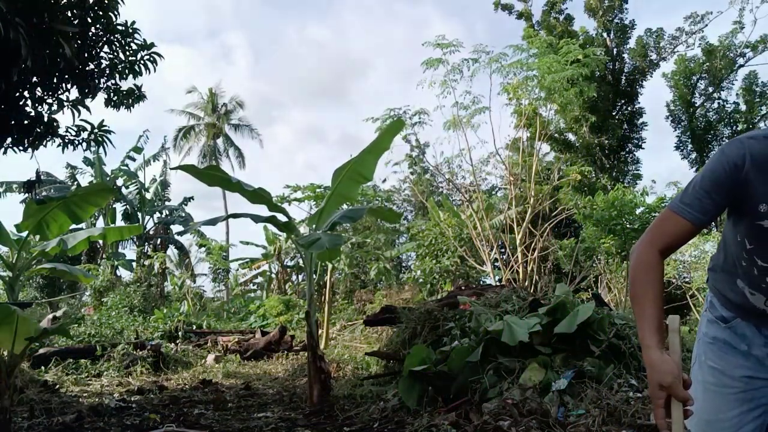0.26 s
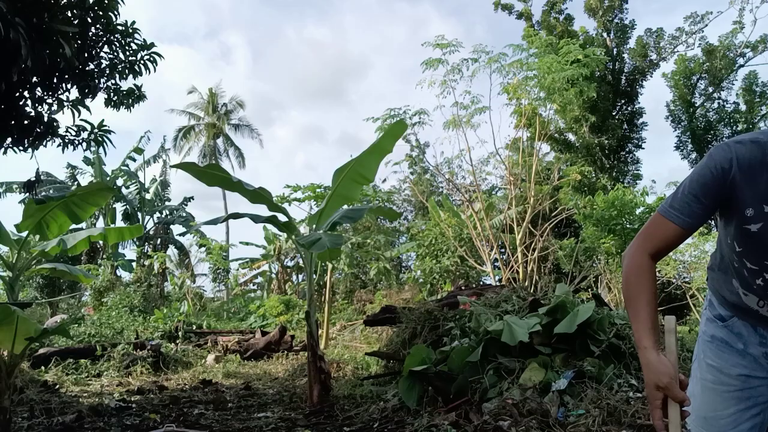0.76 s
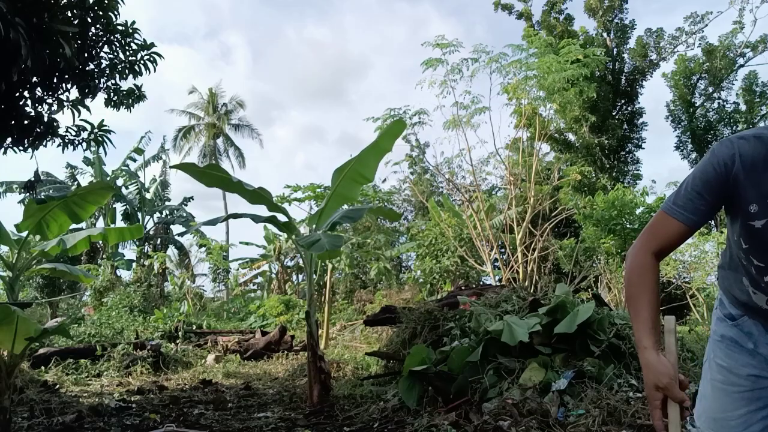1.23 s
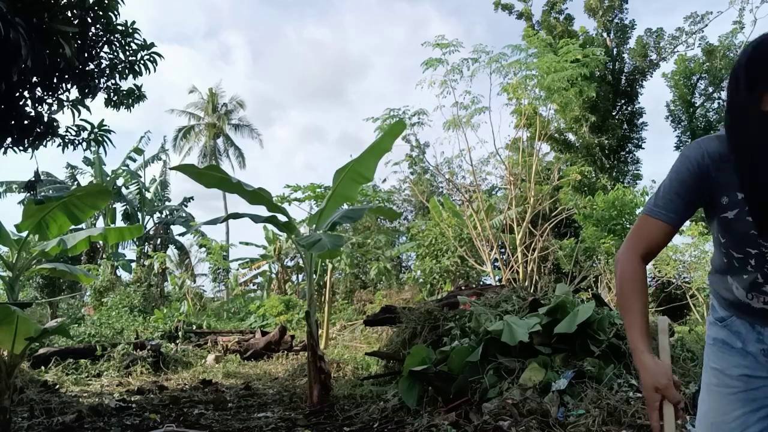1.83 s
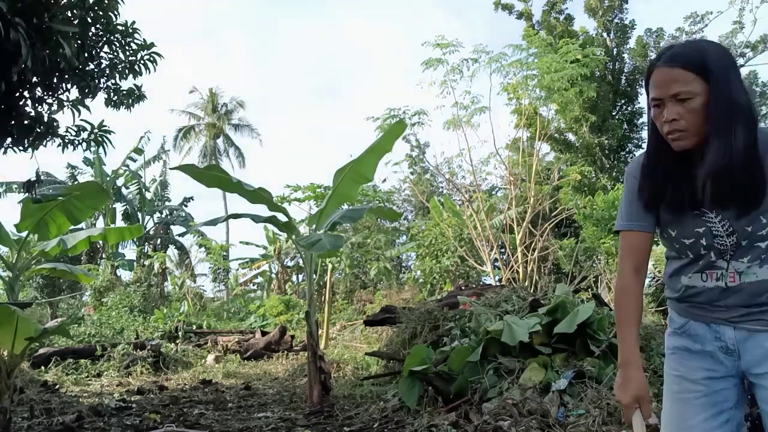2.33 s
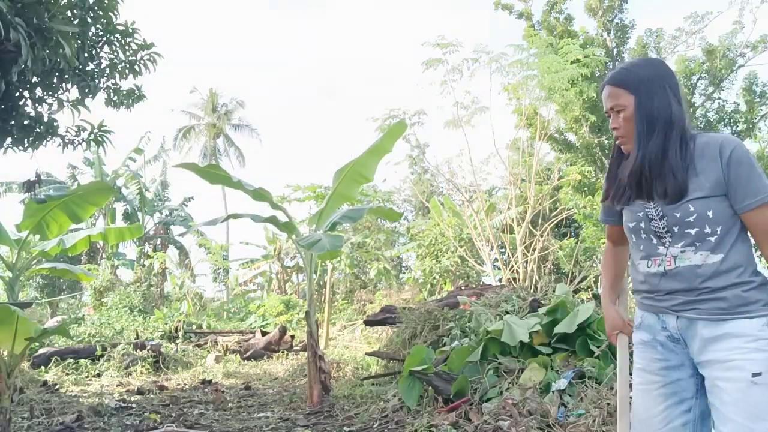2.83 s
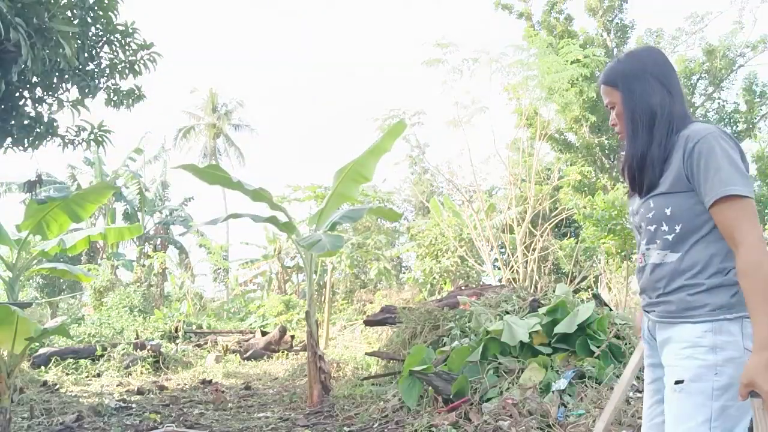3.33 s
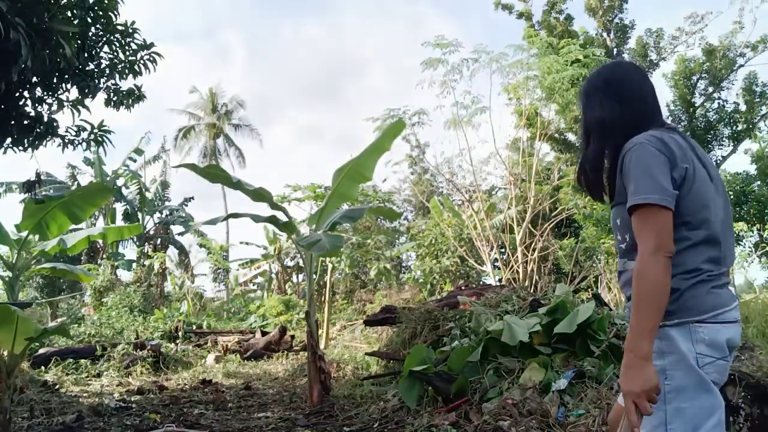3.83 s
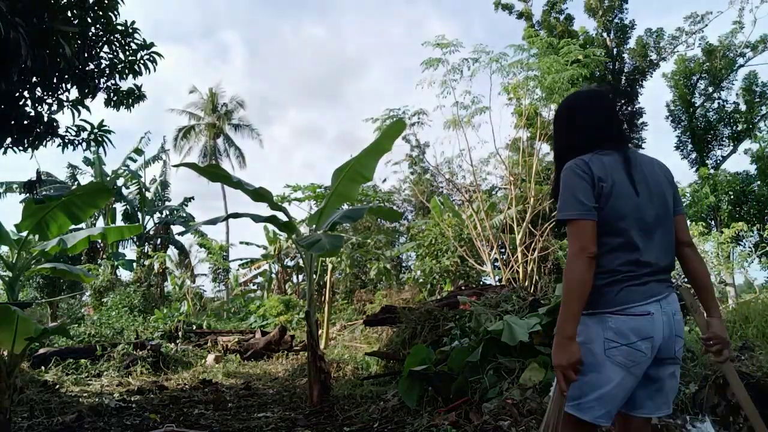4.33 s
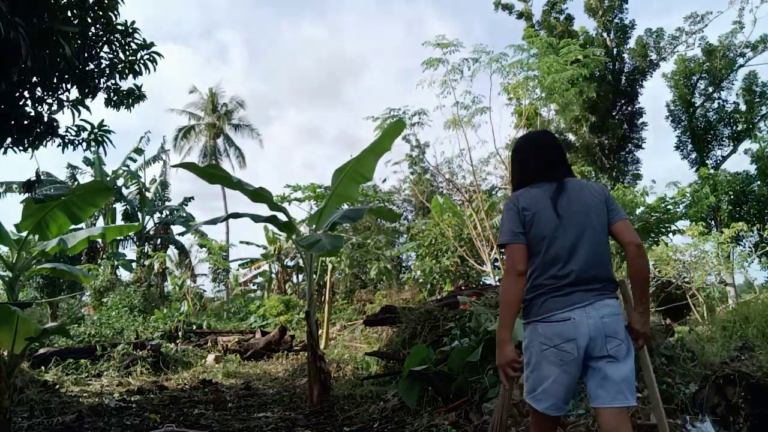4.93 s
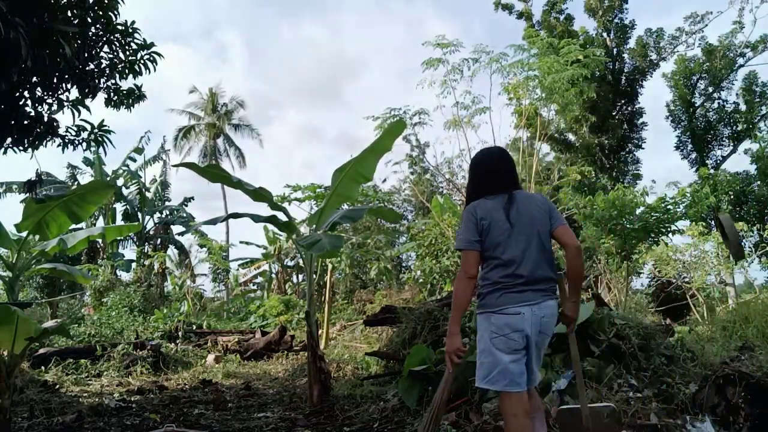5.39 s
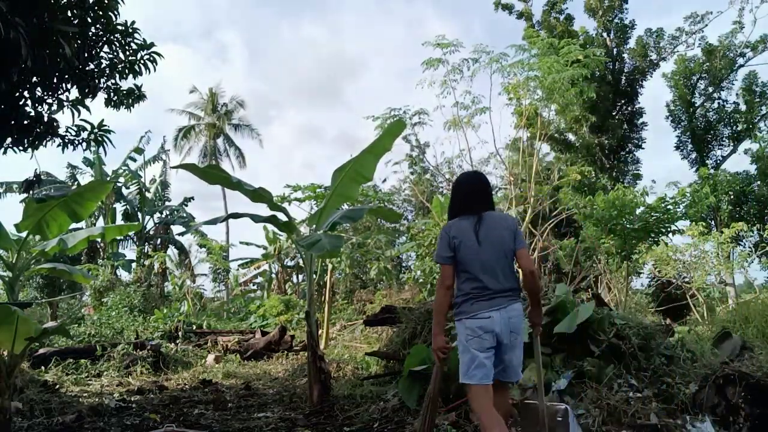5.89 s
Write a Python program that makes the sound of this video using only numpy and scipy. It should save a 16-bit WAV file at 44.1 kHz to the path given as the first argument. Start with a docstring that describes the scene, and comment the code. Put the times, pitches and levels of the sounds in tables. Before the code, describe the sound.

Near stereo microphones outdoors catch irregular twig-broom sweeps over bare soil, leaves crunching and stems snapping. The sweeping gives way to small pan ticks, then one hard, short clank with a thud. Quieter footsteps rustle through leaf litter, with isolated snaps and dull ground thuds. A distant rooster crows weakly between a few late pan knocks, over soft air in the trees and low rumble.

```python
"""Sweeping dry leaves

A stiff twig broom sweeps dry leaves over bare soil into a dustpan, close by in a garden.
Broom and litter are patchy grained noise plus damped tones; the knocked pan is a bank of modes.
Twig snaps and thuds are resonant noise bursts; steps stir the litter. A far rooster is a hoarse
gliding tone, the garden air a swaying noise. Two microphones differ in colour and place."""
import sys
import numpy as np
from scipy import signal
from scipy.fft import rfft, irfft, next_fast_len
from scipy.io import wavfile
from scipy.ndimage import uniform_filter1d, map_coordinates

SR = 44100
rng = np.random.default_rng(int(sys.argv[2]) if len(sys.argv) > 2 else 0)


def to_wav(sig):
    """Store sig (one row per channel, or 1-D mono) as 16-bit WAV at the path in sys.argv[1].

    Samples outside -1..1 are clipped; the rate is SR.
    """
    pcm = np.clip(np.atleast_2d(sig), -1, 1) * 32767
    pcm = np.round(pcm).astype(np.int16)
    wavfile.write(sys.argv[1], SR, pcm.T)  # frames by channels


N = 271215


def amp(db):
    """Gain of a level in dB."""
    return 10 ** (np.asarray(db) / 20)


def unit(x):
    """x at rms 1."""
    return x / np.sqrt(np.mean(x ** 2) + 1e-20)


def along(points, hz):
    """Value at hz from (f/Hz, value) points, linear on a log frequency axis."""
    f, v = np.transpose(points)
    return np.interp(np.log(hz + 1), np.log(f + 1), v)


def curves(rows):
    """One value per sample for each column after the time."""
    s, *cols = np.transpose(rows)
    return [np.interp(np.arange(N) / SR, s, c) for c in cols]


def wobble(knots_per_s):
    """Smooth random curve through normal knots."""
    knots = rng.standard_normal(int(N * knots_per_s / SR) + 4)
    return map_coordinates(knots, [np.arange(N) * knots_per_s / SR])


def filtered(x, response):
    """x times a complex response of frequency."""
    m = next_fast_len(N + SR // 2)
    return irfft(rfft(x, m) * response(np.fft.rfftfreq(m, 1 / SR)), m)[..., :N]


def blend(pair, alike):
    """Two unrelated signals mixed to a left and right of the given likeness."""
    def mix(hz):
        angle = np.arccos(np.clip(along(alike, hz), -1, 1)) / 2
        return np.array([np.cos(angle), np.sin(angle)])
    mid, side = filtered(pair, mix)
    return np.array([mid + side, mid - side])


def arrive(pair, lead_s):
    """Time difference of a source off to the left: the left leads the right by lead_s."""
    return filtered(pair, lambda hz: np.exp(1j * np.pi * hz * lead_s * np.array([[1], [-1]])))


def crackle(per_s, life_s, spread_db, bed):
    """Loudness of many tiny contacts: sudden bursts of uneven size that die fast, over a smooth bed."""
    chance, size = rng.random(N), rng.exponential(size=N)
    starts = (chance < per_s / SR) * amp(spread_db * np.minimum(size, 5)) ** 2
    power = signal.lfilter([1], [1, -np.exp(-1 / (life_s * SR))], starts)
    return np.sqrt(power / power.mean() + bed)


def rush(spectrum, alike, patchy_db, grain=1):
    """Grained stereo noise of rms 1, with random gain in patches of time and frequency."""
    z = signal.stft(grain * rng.standard_normal((2, N)), nperseg=256)[2]
    field = uniform_filter1d(rng.standard_normal(z.shape[1:]), size=2, axis=0)
    field = uniform_filter1d(field, size=10, axis=1)
    pair = signal.istft(z * amp(patchy_db * unit(field)), nperseg=256)[1][:, :N]
    coloured = filtered(pair, lambda hz: amp(along(spectrum, hz)))
    return unit(blend(coloured, alike))


def swells(rows, roundness, lag_s=0, slower=1):
    """Gain per level column: 20 dB up in the rise, 20 dB down in the fall; event powers add.

    roundness is the power of time by which the level leaves its top: 1 a peak, 2 a dome.
    """
    t, power = np.arange(0, N + 32, 32) / SR, 0
    for s, rise_s, fall_s, *level_db in rows:
        u = (t - s - lag_s) / slower
        away = np.where(u < 0, -u / max(rise_s, .002), u / max(fall_s, .002))
        drop_db = np.minimum(20 * away ** roundness, 200)
        power = power + amp(np.array(level_db)[:, None] - drop_db) ** 2
    return np.sqrt([np.interp(np.arange(N) / SR, t, p) for p in power])


# Left-right likeness of near sources: f/Hz, likeness/1
NEAR_ALIKE = [(60, 0.97), (250, 0.95), (1000, 1), (2200, 0.45), (4500, 0.29), (12000, 0.062)]


def cracks(count, centre_hz, cycles):
    """Brittle leaves breaking: short damped tones of scattered pitch and very uneven size, rms 1."""
    when, pitch, size, place = rng.random((count, 4)).T[:, :, None]
    k = np.arange(256)
    hz = centre_hz * 2 ** (2.4 * (pitch - .5))
    decay = np.exp(-np.e * k * hz / SR / cycles)
    tones = amp(-4 * np.log(size + 0.039)) * decay * np.sin(2 * np.pi * hz * k / SR)
    spots = ((when * N).astype(int) + k).ravel()
    pair = []
    for pan_law in (np.cos, np.sin):
        panned = tones * pan_law(2 * np.pi * place)
        pair.append(np.bincount(spots, panned.ravel(), N + 256)[:N])
    return unit(blend(np.array(pair), NEAR_ALIKE))


# Relative spectra of bristle hiss, leaf crackle, scrape, rumble: f/Hz, level/(dB per Hz)
BRISTLES = [(2940, -13), (5000, -2.5), (6960, 5.5), (7550, -2), (8660, 2.5), (9430, 2), (12200, 1),
            (14900, 7), (15500, -38)]
LEAVES = [(710, -54), (1200, -7), (1290, -10), (1510, -9), (2660, -1), (3630, -1.5), (4990, -5.5),
          (6730, -4), (7660, -9.5), (8300, -4.5), (13000, -16)]
SCRAPE = [(240, -38), (400, -14.5), (790, -7), (868, -11.5), (960, -4), (1040, -6.5), (2000, -6.5),
          (2600, -10), (4400, -120)]
RUMBLE = [(35, -41), (60, -19), (263, -0.5), (480, -9), (620, -9), (1060, -120)]
# Long broom strokes: t/s of the top, rise/s, fall/s, hiss/dB, leaf/dB, scrape/dB
STROKES = [(0.014, 0.1, 0.077, -37.5, -43.5, -59), (0.335, 0.12, 0.1, -20, -27, -65),
           (1.005, 0.12, .14, -21.5, -26, -48), (1.162, 0.056, 0.066, -29.5, -36.5, -62),
           (1.575, .14, 0.15, -22.5, -30.5, -70)]
# Gritty scrapes and crunches of leaves and soil, with low rumble: t/s of the top, rise/s, fall/s,
# hiss/dB, leaf/dB, scrape/dB, rumble/dB
CRUNCHES = [(0.062, .02, .04, -60, -60, -48, -63), (0.182, 0.031, .12, -76, -45, -35.5, -36),
            (0.385, 0.043, 0.024, -42.5, -51, -32.5, -53), (0.442, 0.035, 0.054, -19, -19.5, -19, -34),
            (0.468, 0.027, 0.093, -28, -27, -25.5, -41.5), (0.575, 0.03, 0.037, -37.5, -47, -37.5, -53),
            (0.612, 0.038, 0.078, -38, -30, -41.5, -54), (0.7, 0.15, 0.12, -41, -39.5, -45.5, -55),
            (0.764, .015, 0.12, -27, -24.5, -28.5, -35.5), (0.814, 0.062, 0.096, -38, -24, -29, -37.5),
            (0.9, 0.017, 0.15, -53, -31, -37, -49), (1.226, .01, 0.036, -39.5, -48, -49, -73),
            (1.26, 0.044, 0.081, -40, -48, -70, -67), (1.33, 0.02, 0.12, -66, -44, -45, -55),
            (1.418, 0.025, 0.039, -40, -50, -56, -68), (1.608, 0.042, 0.068, -23, -24, -25.5, -53),
            (1.68, 0.1, 0.07, -38, -34.5, -36, -38.5), (1.75, 0.025, 0.049, -38, -36.5, -44, -69),
            (1.8, 0.016, 0.066, -39, -37.5, -55, -73), (1.852, 0.028, .04, -43, -57, -41.5, -55),
            (1.914, 0.067, .11, -49, -24.5, -31, -38), (2.185, 0.03, 0.2, -70, -58, -52, -57),
            (2.297, 0.049, 0.04, -64, -62, -52.5, -49.5), (2.96, 0.05, 0.047, -70, -60, -49, -57),
            (3.014, .006, 0.058, -62, -45, -34.5, -60), (5.696, .008, 0.069, -58, -48, -40.5, -55),
            (5.765, .03, .05, -60, -52, -44, -58)]
# Litter stirred by feet and carried tools: t/s of the top, rise/s, fall/s, hiss/dB, leaf/dB
RUSTLES = [(2.328, 0.012, .1, -58, -48.5), (2.528, 0.031, 0.061, -53.5, -45.5),
           (2.59, 0.04, 0.066, -69, -59.5), (2.972, 0.071, 0.076, -46, -41), (3.012, .02, 0.11, -88, -48),
           (3.14, 0.023, 0.079, -51, -64), (3.192, 0.024, 0.052, -39, -55), (3.232, .03, 0.035, -46.5, -50),
           (3.275, 0.047, 0.14, -60, -53.5), (3.616, 0.0059, 0.076, -54, -51.5),
           (3.714, .015, 0.044, -49.5, -60), (3.815, .01, 0.042, -47.5, -71),
           (3.882, 0.057, 0.047, -42.5, -46.5), (3.97, 0.066, 0.23, -56.5, -52),
           (4.03, 0.047, .04, -51, -51.5), (4.124, 0.11, 0.082, -52.5, -57),
           (4.244, 0.07, 0.048, -45.5, -54.5), (4.43, 0.031, .08, -53.5, -64),
           (4.496, 0.056, 0.049, -47, -51), (4.61, 0.072, 0.021, -52.5, -68), (4.9, 0.14, 0.14, -54, -58.5),
           (4.962, 0.018, 0.038, -51.5, -42.5), (5.025, .005, 0.039, -60, -63),
           (5.694, 0.01, 0.081, -55, -38), (5.73, 0.023, 0.059, -62, -43), (5.762, 0.06, 0.04, -75, -44.5),
           (6.05, 0.049, 0.032, -45, -54), (6.145, 0.036, .04, -55, -60)]
# Litter ticking between events: t/s, leaf level/dB
SETTLING = [(0, -57), (2.1, -66), (2.75, -69.5), (3.4, -64), (4.0, -68.5), (5.0, -62), (5.5, -78.5),
            (5.85, -63), (6.15, -61.5)]
STROKE_ROUND, CRUNCH_ROUND, RUSTLE_ROUND = 2.29, 0.94, 1.01
RUMBLE_LAG_S, RUMBLE_SLOWER = 0.0065, 1.1
SETTLING_HISS_DB = -0.5  # re leaf level


def broom():
    """Bristle tips hiss, leaves crackle in coarser grains, gritty scrapes and rumbles come in lumps."""
    stroke = swells(STROKES, STROKE_ROUND)
    crunch = swells(CRUNCHES, CRUNCH_ROUND)
    rustle = swells(RUSTLES, RUSTLE_ROUND)
    settling = amp(curves(SETTLING)[0])
    settling_hiss = amp(SETTLING_HISS_DB) * settling

    hiss_gain = np.sqrt(stroke[0] ** 2 + crunch[0] ** 2 + rustle[0] ** 2 + settling_hiss ** 2)
    leaf_gain = np.sqrt(stroke[1] ** 2 + crunch[1] ** 2 + rustle[1] ** 2 + settling ** 2)
    scrape_gain = np.hypot(stroke[2], crunch[2])
    rumble_gain = swells(CRUNCHES, CRUNCH_ROUND, RUMBLE_LAG_S, RUMBLE_SLOWER)[3]

    tips = crackle(per_s=700, life_s=.0012, spread_db=2, bed=.7)
    flakes = crackle(per_s=500, life_s=.002, spread_db=2.2, bed=.7)
    lumps = crackle(per_s=140, life_s=0.0076, spread_db=0.5, bed=0.75)
    uneven = wobble(60)  # quick random unevenness of hiss, leaf and scrape level

    hiss = rush(BRISTLES, NEAR_ALIKE, 0.75, tips)
    leaves = rush(LEAVES, NEAR_ALIKE, 4.0, flakes)
    leaves = leaves + amp(-10) * cracks(count=7000, centre_hz=4660, cycles=36)
    scrape = rush(SCRAPE, NEAR_ALIKE, 0.87, lumps)
    rumble = rush(RUMBLE, NEAR_ALIKE, 1.4, lumps)
    return (hiss_gain * amp(0.75 * uneven) * hiss
            + leaf_gain * amp(0.57 * uneven) * leaves
            + scrape_gain * amp(0.43 * uneven) * scrape
            + rumble_gain * rumble)


# Relative spectrum of the garden: f/Hz, level/(dB per Hz)
GARDEN = [(12, -19.5), (20, 3.5), (137, -6), (185, -8), (505, -18.5), (581, -17.5), (811, -21.5),
          (1200, -24), (1340, -23.5), (3260, -26), (7520, -28.5), (8640, -25), (15500, -33.5)]
# Left-right likeness of the garden: f/Hz, likeness/1
FAR_ALIKE = [(30, 0.15), (130, 0.89), (300, 0.22), (700, 0.185), (2000, .05)]
GARDEN_DB = -58.5


def garden():
    """Air in the trees and far rumble: wide noise whose level sways slowly."""
    sway_db = 1.2 * wobble(2.5)
    return amp(GARDEN_DB + sway_db) * rush(GARDEN, FAR_ALIKE, 1.4)


def bursts(events, t60_s, sharpness, attack_s, edge):
    """Dying noise bursts through one broad resonance (two passes), plus an unfiltered bright edge."""
    out, t = np.zeros((2, N + SR)), np.arange(SR // 3) / SR
    envelope = amp(-60 * t / max(t60_s, .002)) * (1 - np.exp(-t / attack_s))
    for s, db, hz in events:
        b, a = signal.iirpeak(min(hz, SR / 3), max(sharpness, .3), SR)
        burst = rng.standard_normal((2, len(t))) * envelope
        burst[:, 1] += 3.5  # one sharp push at the onset
        body = signal.lfilter(b, a, signal.lfilter(b, a, burst))
        event = body / np.abs(body[0]).max() + edge * burst / np.abs(burst[0]).max()
        out[:, round(s * SR):][:, :len(t)] += amp(db) * event
    return blend(out[:, :N], NEAR_ALIKE)


# Twigs and dry stems snapping: t/s, level/dB, f/Hz
SNAPS = [(0.177, -28, 1200), (0.4265, -14, 4160), (0.7603, -20, 2130), (1.3284, -26.5, 2600),
         (1.4104, -46, 6830), (1.7785, -50, 2880), (1.875, -25, 3640), (2.3227, -36, 2040),
         (2.5217, -39, 3050), (2.9242, -31, 5640), (2.9696, -20, 6760), (3.0112, -19, 2460),
         (3.1878, -32, 7040), (3.2312, -34, 6800), (3.303, -37.5, 4000), (3.6152, -41.5, 1970),
         (3.708, -47, 1180), (3.8127, -49, 6570), (4.0721, -25.5, 1890), (4.0745, -31.5, 1680),
         (4.4394, -45.5, 2200), (4.54, -43, 2300), (4.841, -39.5, 1910), (4.9595, -30, 4770),
         (4.9625, -37.5, 2420), (5.0228, -25.5, 7100), (5.043, -42, 8140), (5.1412, -36, 11200),
         (5.1868, -39.5, 6100), (5.636, -37, 6740), (5.692, -33, 3470), (5.734, -21.5, 1290),
         (5.995, -43, 6000), (6.0477, -28.5, 7110)]
SNAP_T60_S, SNAP_EDGE_DB = .009, -4


def twigs():
    """A breaking stem: a bright short noise burst with a strong edge."""
    return bursts(SNAPS, SNAP_T60_S, sharpness=1.3, attack_s=0.00012, edge=amp(SNAP_EDGE_DB))


# Knocks on the pan: t/s, level/dB, favoured f/Hz, share of full ring/1
KNOCKS = [(2.18, -50.5, 580, 0.65), (2.195, -48.5, 506, 1), (2.219, -47, 530, 0.76),
          (2.325, -36.5, 1080, 1), (2.344, -44.5, 1040, 1), (2.997, -27.5, 700, 1.05),
          (3.0102, -13.5, 1000, 0.86), (3.016, -14.5, 1010, 0.57), (3.023, -18, 820, 1.11),
          (3.301, -48.5, 1000, 0.45), (3.352, -56, 1200, .8), (3.364, -55, 1070, 0.74),
          (3.401, -52, 977, 1), (3.412, -47, 990, 0.93), (3.426, -50, 980, 0.81), (3.465, -55, 1010, 1),
          (3.495, -58, 970, 1), (3.535, -53.5, 1030, 1.3), (3.598, -54, 1020, 1), (3.613, -44, 920, 0.77),
          (3.634, -57, 520, 0.63), (3.64, -57, 1210, 1.5), (3.709, -37, 1070, 0.87),
          (3.738, -37, 1170, 0.56), (3.754, -44.5, 490, 0.77), (4.704, -49.5, 905, 0.29),
          (4.935, -53.5, 1060, 1.6), (4.962, -48, 900, 0.37), (5.543, -59, 1100, 0.4),
          (5.694, -35, 790, 1.3), (5.733, -31.5, 1320, 1.37), (5.763, -34, 1150, 0.39),
          (5.856, -45.5, 1340, 0.66), (5.914, -52.5, 520, 1), (6.026, -49.5, 480, 0.37),
          (6.048, -31, 490, 0.23)]
# Pan modes: nominal f/Hz, mean level/dB, full t60/s before the cap LONGEST_S
PAN_MODES = [(237, -12, 0.04), (315, -27, 5.0), (448, -16, 0.16), (509.6, -11, 0.23), (719, -7.5, 0.27),
             (836, -1, 0.11), (922.6, -4, 0.12), (976.6, -2, 0.14), (1057, -4.5, 0.11), (1126, -8.5, 0.17),
             (1182, -10, 0.16), (1388, -12, 0.17), (1468, -26, 0.087), (1586, -2, 0.11), (1860, -1, 0.093),
             (1980, -18, 0.26), (2090, -32, 0.18), (2273, 2.5, 0.16), (2440, -15, 0.23), (2380, -21, 0.12),
             (2570, -17, 0.16), (2740, -18.5, 0.11), (2864, -19, 0.21), (2970, -27, 0.19),
             (3200, -21, 0.17), (3360, 4, 0.11), (3741, -12, 0.12)]
REACH_OCTAVES = .22  # modes that a light blow wakes around its favoured pitch
REACH_AT_DB, REACH_GROWS = -36, 0.77  # blows above this level wake more; dB of reach per dB
HARD_ATTACK_S, LIGHT_ATTACK_S = 0.00059, 0.0025  # light touches start softly
LONGEST_S = .2  # longest ring allowed to any pan mode, before the knock's share
DRIFT = .4  # phase drift scale


def pan():
    """Each knock rings the pan's modes at new strengths, most those near its favoured pitch."""
    steps_n, hold = 256, 48  # phase drift steps, samples per step
    out, t = np.zeros((2, N + SR)), np.arange(steps_n * hold) / SR
    hz, level_db, t60_s = np.transpose(PAN_MODES)[:, :, None]
    for s, db, centre_hz, share in KNOCKS:
        luck = rng.standard_normal((3, 2, len(PAN_MODES), 1))
        octaves = REACH_OCTAVES * amp(REACH_GROWS * max(db - REACH_AT_DB, 0))
        off_pitch_db = 6 * (np.log2(hz / centre_hz) / octaves) ** 2
        strength_db = level_db + 4.9 * luck[0] - off_pitch_db

        # random phase drift roughens the ring
        drift = np.cumsum(rng.standard_normal((len(PAN_MODES), steps_n)), axis=1)
        drift = DRIFT * np.sqrt(hz / 700) * np.repeat(drift, hold, axis=1)
        detuned_hz = hz * (1 + 0.0124 * luck[1, 0])
        phase = 2 * np.pi * detuned_hz * t + 1.21 * luck[2] + drift

        ring_t60_s = np.minimum(t60_s, LONGEST_S) * np.clip(share, .1, 3)
        modes = amp(strength_db - 60 * t / ring_t60_s) * np.sin(phase)
        attack_s = HARD_ATTACK_S if db > REACH_AT_DB else LIGHT_ATTACK_S
        ring = np.sum(modes, axis=1) * (1 - np.exp(-t / attack_s))
        out[:, round(s * SR):][:, :len(t)] += amp(db) * ring / np.abs(ring[0]).max()
    return blend(out[:, :N], NEAR_ALIKE)


# Soles and tools meeting the soil: t/s, level/dB, f/Hz
THUDS = [(2.317, -45, 247), (2.549, -50.5, 182), (3.008, -24, 317), (3.612, -49, 164), (3.71, -41.5, 270),
         (3.869, -50.5, 263), (4.109, -53.5, 234), (4.489, -47.5, 215), (4.532, -46, 257),
         (4.613, -57, 320), (4.703, -49, 222), (5.078, -50.5, 174), (5.127, -57.5, 198), (5.69, -34.5, 216),
         (5.736, -36.5, 219), (5.769, -45.5, 237), (5.83, -45, 172), (6.031, -48, 106), (6.049, -36.5, 262),
         (6.091, -49, 92)]
THUD_T60_S = 0.19


def steps():
    """Soft low pushes on the soil: low resonant bursts with no bright edge."""
    return bursts(THUDS, THUD_T60_S, sharpness=0.94, attack_s=0.00056, edge=0)


# Far rooster's notes: t/s, length/s, first f/Hz, last f/Hz, level/dB, fade over the note/dB,
# lower octave level/dB
CROW = [(5.22, .05, 1760, 1780, -80, 0, -66), (5.245, .085, 1740, 1820, -68, -2, -82),
        (5.452, .24, 1680, 1745, -54.5, -12, -76), (5.8, .25, 1650, 1610, -58.5, -4, -90)]
CROW_EDGE_S, FLUTTER_DB = 0.016, 4


def rooster():
    """A hoarse wavering tone and its lower octave, smeared differently on the way to each microphone."""
    out, t = np.zeros((2, N)), np.arange(N) / SR
    for s, length_s, first_hz, last_hz, db, fade_db, low_db in CROW:
        u = np.clip((t - s) / length_s, 0, 1)
        gate = np.clip(np.minimum(u, 1 - u) * length_s / CROW_EDGE_S, 0, 1)
        pitch_hz = (first_hz + (last_hz - first_hz) * u) * (1 + 0.009 * wobble(120))
        phase = 2 * np.pi * np.cumsum(pitch_hz) / SR
        for side in out:
            flutter = amp(FLUTTER_DB * wobble(68))
            tone = amp(db + fade_db * u) * np.sin(phase + 1.7 * wobble(60))
            low_octave = amp(low_db) * np.sin(phase / 2)
            side += gate * flutter * (tone + low_octave)
    return out


def scene():
    """The sweeping is off to one side, the pan and the steps nearer the middle."""
    sweeping = arrive(broom(), 0.000266)
    knocks_and_steps = arrive(pan() + twigs() + steps(), 0.00015)
    return sweeping + knocks_and_steps + rooster() + garden()


# Left level over right: f/Hz, ratio/dB
LEFT_OVER_RIGHT = [(60, 0.5), (700, -0.5), (2400, 1.1), (4400, 3), (5800, 4.5), (6900, 30), (7900, -12.5),
                   (9500, -2), (11500, 1), (13000, 6), (14300, 35.5), (15500, 35)]
# Treble lift of the whole scene: f/Hz, lift/dB
TREBLE_LIFT = [(9000, 0), (13000, 1), (15500, 5)]
TOP_HZ = 15600


def record(dry):
    """The ports share the power unevenly by frequency; nothing is kept above the band limit."""
    def ports(hz):
        left_power = 2 / (1 + amp(-along(LEFT_OVER_RIGHT, hz)) ** 2)
        balance = np.sqrt([left_power, 2 - left_power])
        return balance * amp(along(TREBLE_LIFT, hz)) * (hz < TOP_HZ)
    return filtered(dry, ports)


dry = scene()
out = record(dry)
to_wav(out)
```